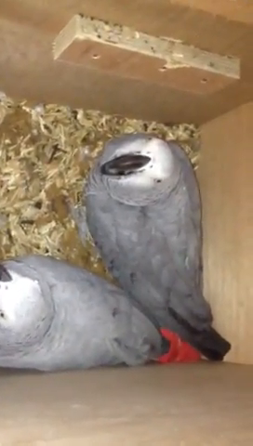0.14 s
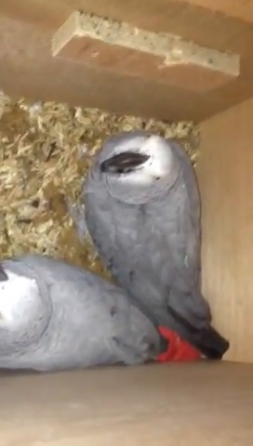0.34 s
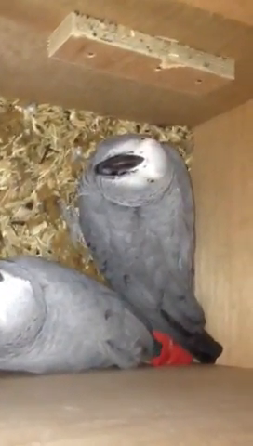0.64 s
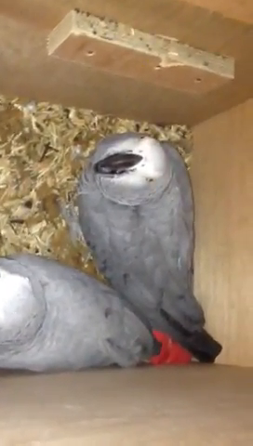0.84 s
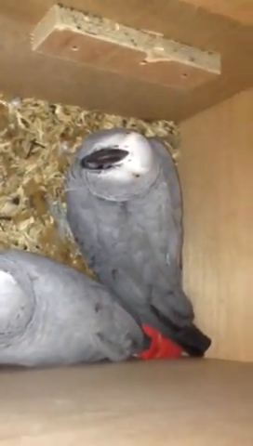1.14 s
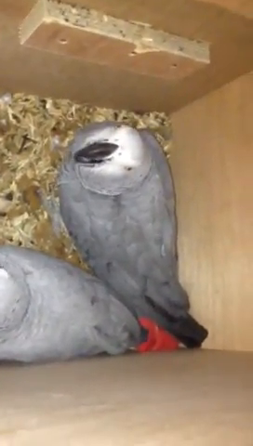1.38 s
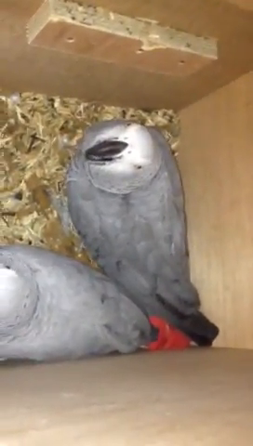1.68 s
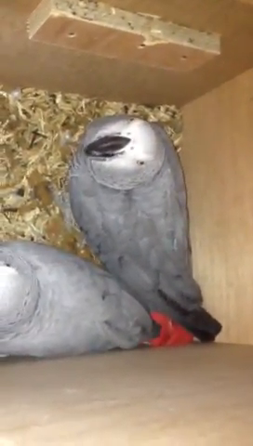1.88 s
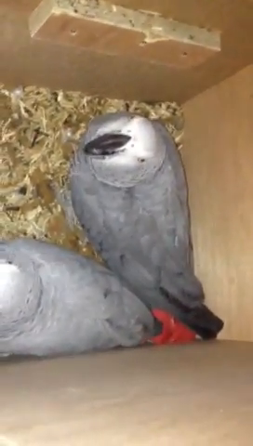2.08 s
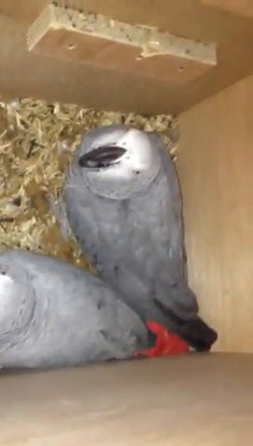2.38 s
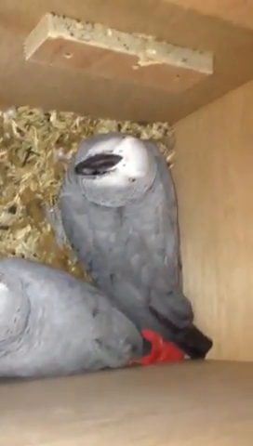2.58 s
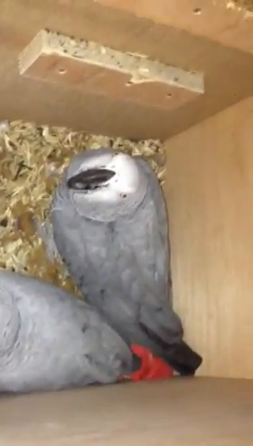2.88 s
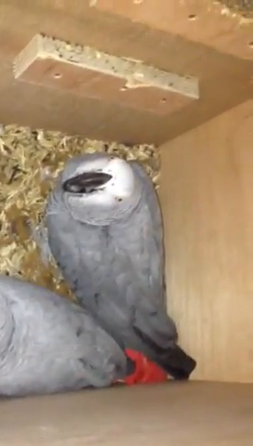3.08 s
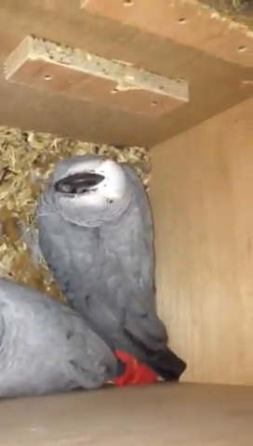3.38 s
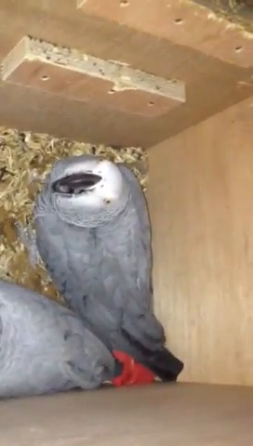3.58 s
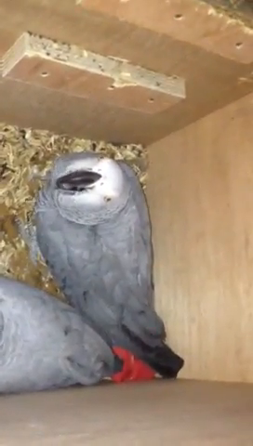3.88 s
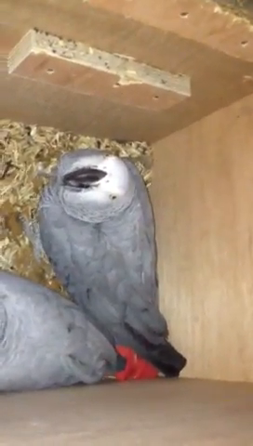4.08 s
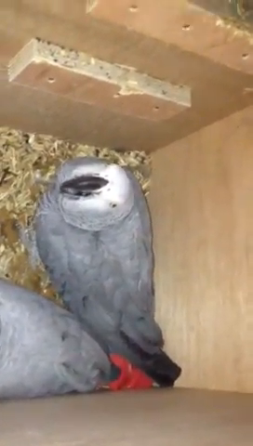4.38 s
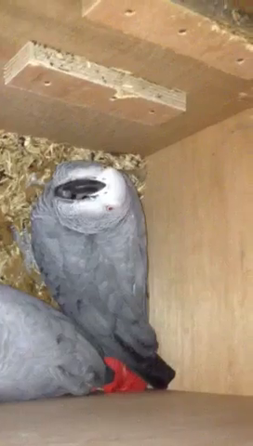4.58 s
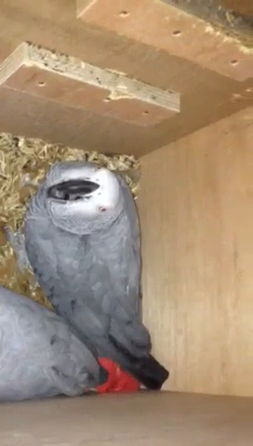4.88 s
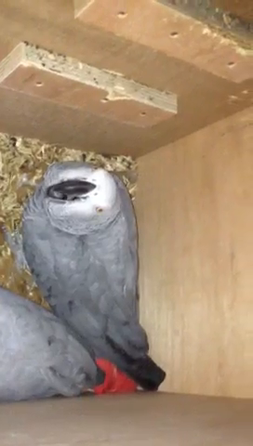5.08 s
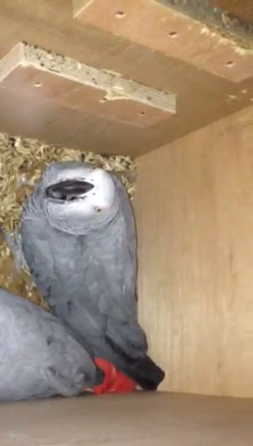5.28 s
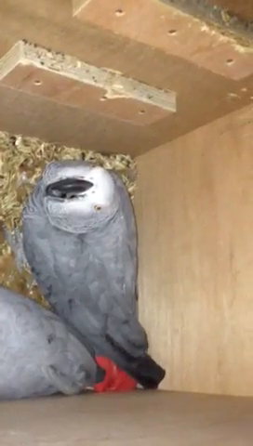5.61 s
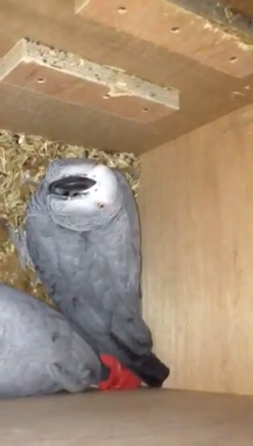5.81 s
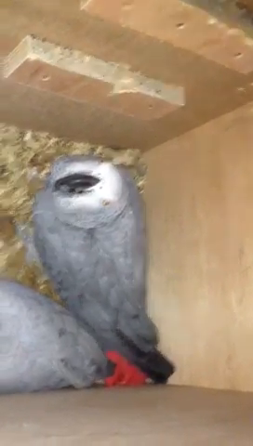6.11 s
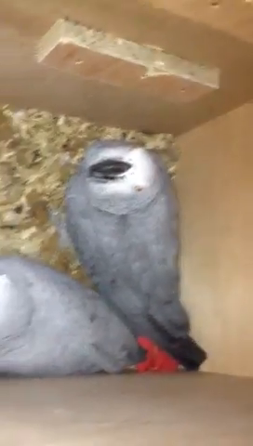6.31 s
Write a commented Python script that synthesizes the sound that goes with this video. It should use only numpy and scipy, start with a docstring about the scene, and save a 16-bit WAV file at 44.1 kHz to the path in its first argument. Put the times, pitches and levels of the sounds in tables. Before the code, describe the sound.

Two parrots growl close to the microphone in a small, resonant wooden box. One rasps broadly, the other sounds hollow; both flutter rapidly through a strong hiss. The growl sinks to a low croak, rises for a second long bout, breaks into rattle and pops, then rises a third time and ends croaking. A faint hum and steady hiss lie beneath.

```python
"""Inside a wooden nest box, two grey parrots growl at a camera held in close.
Both growl from the start, one rasping broadly and at once strong, the other more hollow and gaining
strength: each throat flutters about a hundred times a second and chops a strong hiss. The growl sinks to
a low, croaking rattle near 1.7 s, rises for a second long bout, sinks again near 4 s with slack pops,
rises a third time and ends in rattle and pops. A hum at two and three times the flutter and a faint hiss
lie beneath; the small box rings on the voices."""
import sys
import numpy as np
from scipy import signal
from scipy.fft import rfft, irfft, next_fast_len
from scipy.io import wavfile
from scipy.ndimage import uniform_filter1d, minimum_filter1d, map_coordinates

SR = 44100
rng = np.random.default_rng(int(sys.argv[2]) if len(sys.argv) > 2 else 0)


def store_pcm(level_fs):
    """Save levels as 16-bit WAV."""
    pcm = np.round(np.clip(level_fs, -1, 1) * 32767).astype(np.int16)
    wavfile.write(sys.argv[1], SR, np.atleast_2d(pcm).T)


N = 284445

# colour of a croaking throat, shared by croaks and pops: f/Hz, relative level/dB
CROAK_COLOUR = [(150, -20), (500, -19.5), (680, -23.5), (900, -3), (1200, 1.5), (1750, -0.5), (2200, -18),
                (4000, -18), (6500, -29.5), (9000, -39.5), (15000, -25.5)]
RUMBLE_REST_DB = -54.5  # the chest rumble between its swells


def amp(db):
    """Decibels to gain."""
    return 10 ** (np.asarray(db) / 20)


def unit(x):
    """Scale to rms 1."""
    return x / np.sqrt(np.mean(x ** 2) + 1e-20)


def curve(rows):
    """One value per sample, in straight lines between (time, value) rows."""
    t, values = np.transpose(rows)
    return np.interp(np.arange(N) / SR, t, values)


def wobble(rate):
    """A smooth random curve through normally distributed knots, rate knots a second."""
    knots = rng.standard_normal(int(N * rate / SR) + 4)
    return map_coordinates(knots, [np.arange(N) * rate / SR])


def swell(start, end, attack, release):
    """Gain that rises, holds at 1 and falls; all times in s."""
    t = np.arange(N) / SR
    return np.clip((t - start) / attack, 0, 1) * np.clip((end - t) / release, 0, 1)


def rumble_swell():
    """dB over rest: the chest growl never stops, and swells as each bout runs out."""
    # chesty rumbles that bridge the breaks: start t/s, end t/s, level/dB
    rumbles = [(1.29, 2.32, -39.5), (3.72, 4.62, -38.5), (5.95, 6.9, -40.5)]
    attack_s, release_s = 0.26, 0.41
    swells = np.zeros(N)
    for start, end, db in rumbles:
        swells += amp(db - RUMBLE_REST_DB) * swell(start, end, attack_s, release_s)
    return 10 * np.log10(1 + swells ** 2)


def bouts(rows):
    """Gain, treble dB and beak opening: a bout drifts, has one push, and the beak opens and shuts once."""
    push_half_s = 0.21
    arch_shape = 0.84  # small = the beak is wide open sooner
    t = np.arange(N) / SR
    gain, treble_db, opening = np.zeros((3, N))
    for start, end, attack, release, first_db, last_db, push_at, push_db, first_treble, last_treble in rows:
        progress = np.clip((t - start) / (end - start), 0, 1)
        push = np.exp(-((t - push_at) / push_half_s) ** 2)
        level_db = first_db + (last_db - first_db) * progress + push_db * push
        gain += swell(start, end, attack, release) * amp(level_db)
        drifting_treble = first_treble + (last_treble - first_treble) * progress
        treble_db = np.where(t >= start, drifting_treble, treble_db)
        opening += np.abs(np.sin(np.pi * progress)) ** arch_shape
    return gain, treble_db, opening


def flutter(rate_hz, jitter, scatter_db, puff_life, snap_db, leak_db, rebound_db=-6, rebound_delay=0.00299):
    """Each throat opening gives a snap and a puff of turbulence that swells and dies; some air always leaks.

    jitter, puff_life and rebound_delay are in s."""
    opens = np.flatnonzero(np.diff(np.floor(np.cumsum(rate_hz) / SR)))
    late, size, slack, bounce = rng.standard_normal((len(opens), 4)).T

    def place(at, db):
        """Impulses at the given samples."""
        return np.bincount(np.clip(at, 0, N - 1).astype(int), amp(db), N)

    snaps = place(opens + late * jitter * SR, scatter_db * np.tanh(size))
    # the membranes bounce open again, less punctually
    rebounds = opens + (rebound_delay + 2 * slack * jitter) * SR
    snaps += place(rebounds, rebound_db + scatter_db * np.tanh(bounce))
    age = np.arange(SR // 20) / SR / puff_life
    flow = signal.fftconvolve(snaps, np.sqrt(age) * np.exp(-age))[:N]
    air = (unit(flow) + amp(leak_db)) * rng.standard_normal(N)
    return unit(unit(air) + amp(snap_db) * unit(snaps))


def voiced(x, throat, size=8192):
    """Causal ringing of a throat colour and the box modes, at unchanged power for a flat input."""
    # modes (lift over 0) and nulls (under 0) of the box with the birds in it: f/Hz, width/Hz, lift/dB
    box = [(209, 46, 3), (298.7, 31, 12.5), (454, 23, -8.5), (524, 38, 11.5), (824, 85, 9), (868, 44, -11),
           (1010, 64, 6), (1065, 28, -8.5), (1220, 175, 6), (1705, 61, 4), (1810, 25, -14), (1942, 32, 7.5),
           (2203, 210, 9), (2593, 23, 9), (2835, 62, 6), (3040, 32, -2), (3163, 71, 7.5), (3384, 35, -3.5),
           (3426, 56, 8.5), (3500, 59, -4.5), (3997, 320, 6.5), (4450, 79, -1.5), (4500, 47, 5.5),
           (4640, 38, 7.5), (6080, 390, 6), (7050, 69, -26), (7257, 75, 11), (9170, 410, 6.5),
           (11470, 115, 10.5), (12740, 150, 14), (13900, 350, 6)]
    hz = np.fft.rfftfreq(size, 1 / SR)
    f, db = np.transpose(throat)
    colour_db = np.interp(np.log(hz + 1), np.log(f), db)
    for centre, width, lift in box:
        colour_db = colour_db + lift / (1 + (2 * (hz - centre) / width) ** 2)
    # folding the cepstrum forward makes the ring minimum-phase
    cepstrum = irfft(np.log(amp(colour_db)))
    cepstrum[1:size // 2] *= 2
    cepstrum[size // 2 + 1:] = 0
    ring = irfft(np.exp(rfft(cepstrum)))
    return signal.fftconvolve(x, ring / np.linalg.norm(ring))[:N]


def brighten(x, treble_db, corner_hz):
    """Lift or lower the treble over time, as an opening beak lifts it."""
    low_pass = signal.butter(1, corner_hz, fs=SR, output="sos")
    dull = signal.sosfiltfilt(low_pass, x)
    return dull + amp(treble_db) * (x - dull)


def faint_hiss():
    """An even white hiss under everything."""
    return amp(-57.5) * rng.standard_normal(N)


def drone(rate_hz, third_lift_db=3.0):
    """The box picks out the second and third harmonics of the flutter: two wavering sines."""
    # hum at three times the flutter rate: t/s, level/dB before the lift
    hum = [(0, -51), (.55, -55.5), (.9, -43), (1.15, -50), (1.4, -46), (1.65, -35), (2.1, -37),
           (2.3, -47.5), (3.1, -54.5), (3.8, -47), (4.4, -41.5), (4.85, -55), (5.08, -44), (5.4, -32),
           (5.52, -46), (5.85, -41.5), (6.45, -39.5)]
    second_rest_db, second_follows = -51, 0.53  # level at rest, share of the rumble's swell
    phase = 2 * np.pi * np.cumsum(rate_hz) / SR
    second_db = second_rest_db + second_follows * rumble_swell()
    third_db = curve(hum) + third_lift_db
    lines = np.zeros(N)
    for harmonic, db in ((2, second_db), (3, third_db)):
        level = amp(db + 2.4 * wobble(14))
        lines += level * np.sin(harmonic * phase + .4 * wobble(25))
    return lines


def chest_rumble(rate_hz):
    """With little air the flutter turns uneven and rumbles deep in the chest."""
    # colour of the chest: f/Hz, relative level/dB
    chest_colour = [(30, -27), (75, -31), (105, -14), (140, -1.5), (175, -6.5), (280, -6), (340, -3.5),
                    (420, -20.5), (600, -18), (1200, -52)]
    source = flutter(rate_hz, jitter=.003, scatter_db=0.5, puff_life=0.0027, snap_db=-2, leak_db=0)
    return voiced(source * amp(RUMBLE_REST_DB + rumble_swell()), chest_colour)


def dry_croak(rate_hz, uneven_db=3):
    """With little air the throat snaps unevenly: a dry croak around the breaks."""
    # croaks: start t/s, end t/s, attack/s, release/s, first level/dB, last level/dB,
    # push t/s, push/dB, first treble/dB, last treble/dB
    croak_bouts = [(1.62, 1.875, .05, 0.034, -32, -32.5, 1.94, -1.5, 3, 1),
                   (1.85, 2.45, 0.039, 0.23, -29.5, -29, 2.27, 2.5, 4.5, 3),
                   (3.7, 4.6, 0.086, 0.12, -40.5, -30.5, 4.3, 0, -2, 9),
                   (5.85, 6.5, .15, 0.052, -35.5, -45, 5.96, 2, 0, 0)]
    gain, treble_db, _ = bouts(croak_bouts)
    source = flutter(rate_hz, jitter=.0005, scatter_db=3, puff_life=.0012, snap_db=-2, leak_db=-7,
                     rebound_db=-6.5)
    croak = voiced(source * gain * amp(uneven_db * wobble(80)), CROAK_COLOUR)
    return brighten(croak, treble_db, corner_hz=2700)


def pops(snap_db=-5, lift_db=12.5):
    """Single slack openings of the throat: a snap, then a short gurgle of air."""
    # the clearest croaking pops: t/s, level/dB before the lift, life/s
    slack_openings = [(3.8846, -18, .0014), (3.9205, -19, .0015), (3.944, -18, .004),
                      (3.957, -19.5, 0.0044), (3.9985, -19, .0015), (4.029, -20, 0.0069),
                      (4.085, -23, .003), (4.136, -22, 0.0045), (6.2457, -20, .0011),
                      (6.277, -20.5, 0.0054), (6.306, -22, 0.005), (6.341, -21.5, 0.0055),
                      (6.401, -23.5, 0.0047), (6.439, -17, 0.0045)]
    t = np.arange(SR // 30) / SR
    source = np.zeros(N + SR)
    for start, db, life in slack_openings:
        puff = np.exp(-t / life) * rng.standard_normal(len(t))
        puff /= np.linalg.norm(puff)
        puff[0] += amp(snap_db)
        source[round(start * SR):][:len(t)] += amp(db + lift_db) * puff
    return voiced(source[:N], CROAK_COLOUR)


def hollow_bird(rate_hz, beak_db=7.0, open_loss_db=-3.0):
    """Membranes opening twice a cycle in a narrowly resonant throat; an open beak thins and brightens it."""
    # colour of the hollow throat: f/Hz, relative level/dB
    throat = [(100, -42), (650, -25.5), (850, -14), (1000, -1), (1280, -2.5), (1500, -6.5), (1950, -10),
              (2150, -1), (2380, 1.5), (2650, -5), (3000, -17.5), (4000, -6), (4620, -0.5), (5000, -6.5),
              (5400, -25), (5600, -22), (6000, -19.5), (7200, -13.5), (15500, -43.5)]
    # bouts, loud and faint: start t/s, end t/s, attack/s, release/s, first level/dB, last level/dB,
    # push t/s, push/dB, first treble/dB, last treble/dB
    hollow_bouts = [(-.05, 1.68, 0.023, 0.048, -26, -15.5, .82, 3.5, 5.5, -1.5),
                    (1.665, 1.86, .015, .02, -37, -35, 1.8, 0.5, -7, -4),
                    (2.15, 3.78, 0.32, 0.21, -23.5, -19, 2.06, 1.5, 2, -6),
                    (4.08, 4.33, .15, 0.069, -44, -36, 4.26, 1, -8, -7),
                    (4.24, 6.07, 0.2, .16, -20, -16.5, 4.415, 6.5, -3.5, -6.5)]
    gain, treble_db, opening = bouts(hollow_bouts)
    source = flutter(rate_hz, jitter=.00025, scatter_db=1.6, puff_life=.0012, snap_db=-4.5, leak_db=-3,
                     rebound_db=-2.5, rebound_delay=.0045)
    growl = voiced(source * gain * amp(open_loss_db * opening), throat)
    return brighten(growl, treble_db + beak_db * opening + 1.2 * wobble(70), corner_hz=3020)


def rasping_bird(rate_hz, beak_db=4.0, shut_leak_db=-9, open_leak_db=0, sputter_db=3.0):
    """A wide, harsh growl: sputtering pulses at both ends of a bout, blurring into hiss at full flow."""
    # colour of the rasping throat: f/Hz, relative level/dB
    throat = [(100, -49), (450, -25), (660, -36), (800, -10), (1150, 1), (1600, 3.5), (2300, -2.5),
              (2900, -1), (4600, -3), (6300, -6.5), (8000, -16), (10500, -24), (12700, -20), (15500, -26.5)]
    # bouts: start t/s, end t/s, attack/s, release/s, first level/dB, last level/dB,
    # push t/s, push/dB, first treble/dB, last treble/dB
    rasp_bouts = [(-.05, 1.25, 0.027, 0.34, -17, -27, 0.085, 1.5, 2, -14.5),
                  (1.87, 3.825, 0.066, 0.2, -18, -19.5, 2.15, 1.5, -3.5, -2.5),
                  (4.25, 6.18, 0.28, 0.16, -24, -16.5, 4.59, 5.5, 2.5, -6.5)]
    gain, treble_db, opening = bouts(rasp_bouts)
    leak_db = shut_leak_db + (open_leak_db - shut_leak_db) * opening
    source = flutter(rate_hz, jitter=.00035, scatter_db=2.1, puff_life=.0014, snap_db=-5.5, leak_db=leak_db,
                     rebound_db=-4, rebound_delay=.0028)
    sputter = amp(sputter_db * (1 - opening) * wobble(60))
    growl = voiced(source * gain * sputter, throat)
    return brighten(growl, treble_db + beak_db * opening + 0.85 * wobble(60), corner_hz=2720)


def scene():
    """Both birds close by in the box, over a hum and a faint even hiss."""
    # shared pace of the throats' flutter: t/s, f/Hz
    flutter_pace = [(0, 104.1), (.55, 103.2), (1.3, 106.8), (1.65, 102.5), (3.1, 104.3), (3.7, 102.5),
                    (4.4, 104.6), (5.5, 102.5), (6.45, 102.9)]
    pace = curve(flutter_pace)
    # each throat strays from the pace on its own
    rasping_rate = pace * (1 + .01 * wobble(25))
    hollow_rate = pace * (1 + .015 * wobble(25))
    background = faint_hiss() + drone(pace)
    rattle = chest_rumble(rasping_rate) + dry_croak(rasping_rate) + pops()
    growls = hollow_bird(hollow_rate) + rasping_bird(rasping_rate)
    return (background + rattle + growls)[None]


def record(dry, low_cut_hz=90, ceiling=0.61, top_hz=15600):
    """The microphone drops the deep bass, a fast limiter holds the peaks, and the band ends at top_hz."""
    high_pass = signal.butter(2, low_cut_hz, "high", fs=SR, output="sos")
    thin = signal.sosfilt(high_pass, dry)
    needed = ceiling / np.maximum(np.abs(thin), ceiling)
    # the gain dips smoothly around each peak, within 81 samples
    limiter_gain = uniform_filter1d(minimum_filter1d(needed, size=81), size=81)
    held = thin * limiter_gain
    size = next_fast_len(N + SR // 2)
    in_band = np.fft.rfftfreq(size, 1 / SR) < top_hz
    return irfft(rfft(held, size) * in_band, size)[..., :N]


dry = scene()
out = record(dry)
store_pcm(out)
```